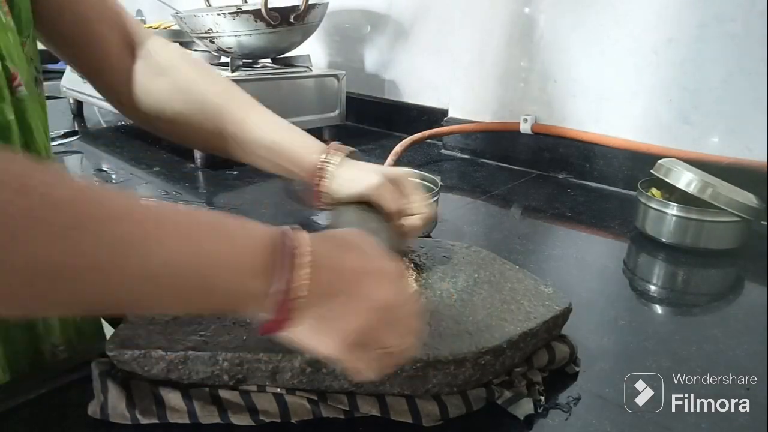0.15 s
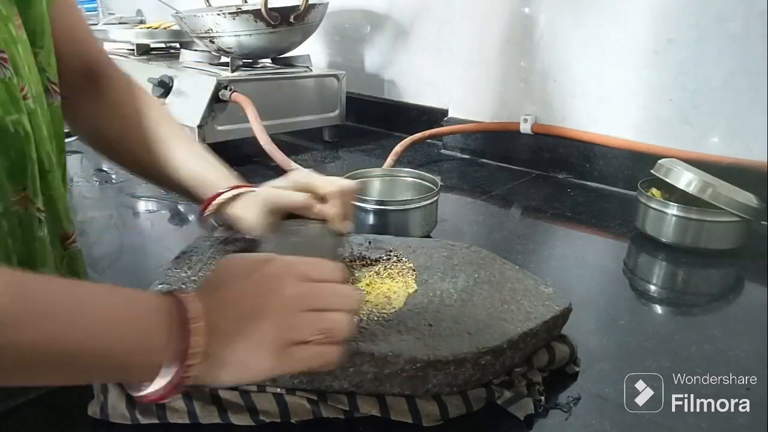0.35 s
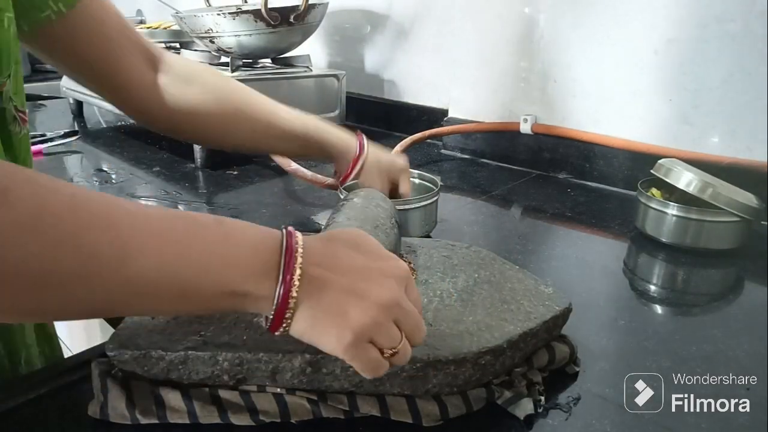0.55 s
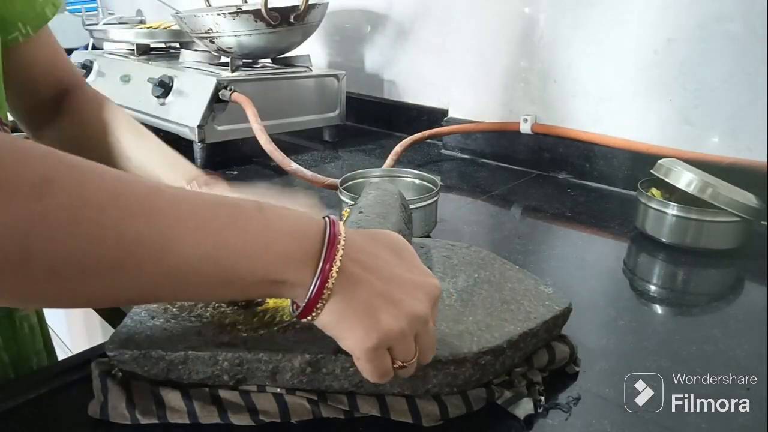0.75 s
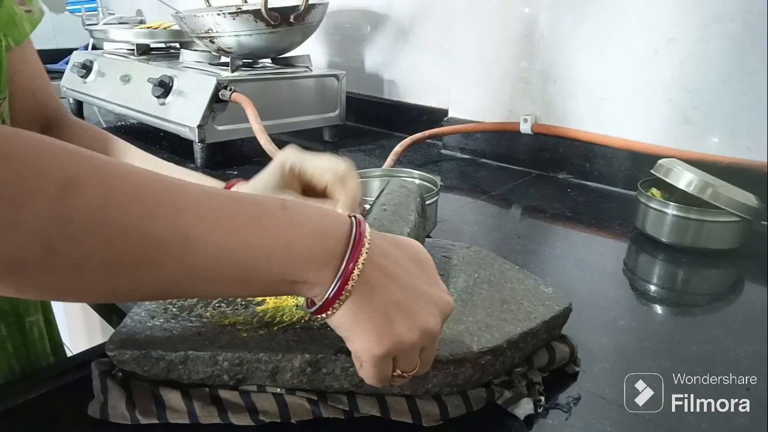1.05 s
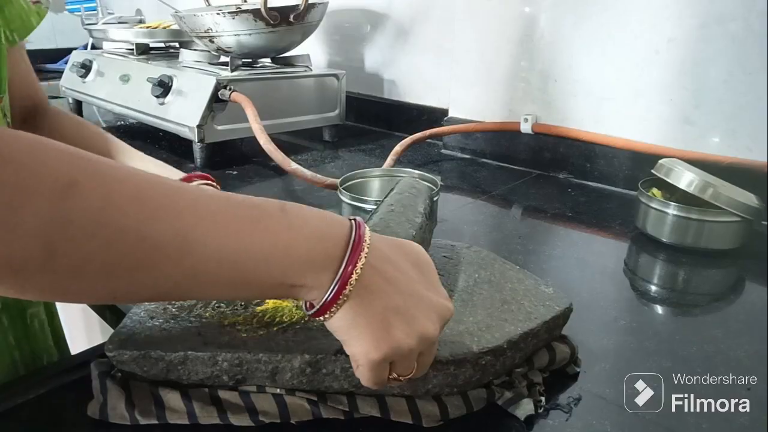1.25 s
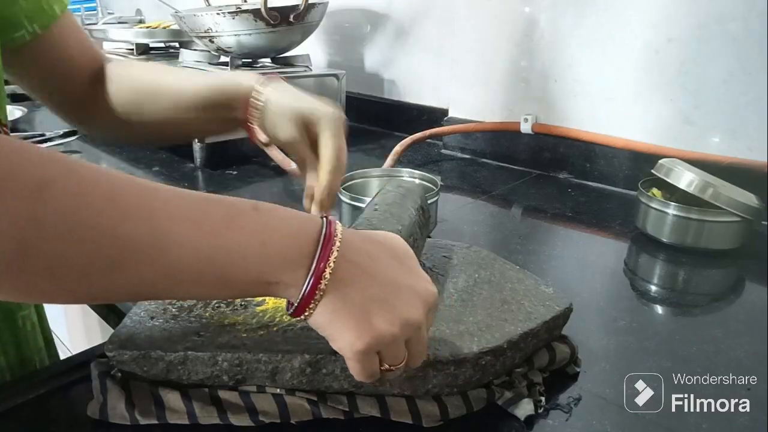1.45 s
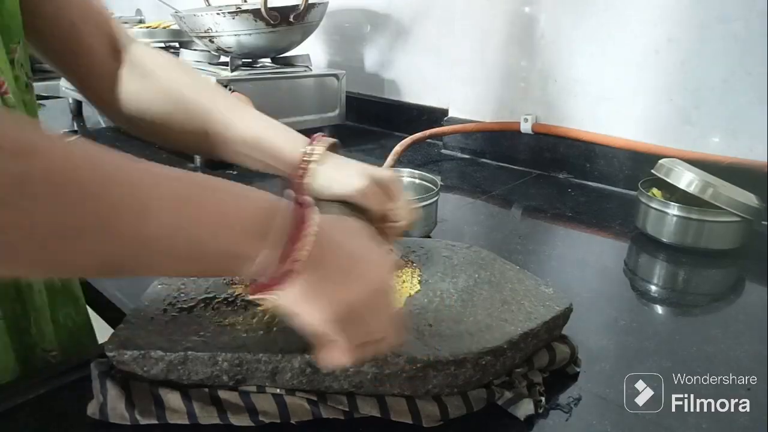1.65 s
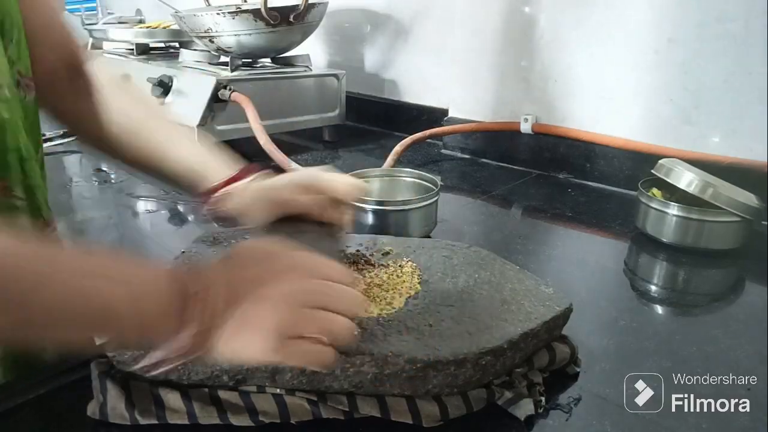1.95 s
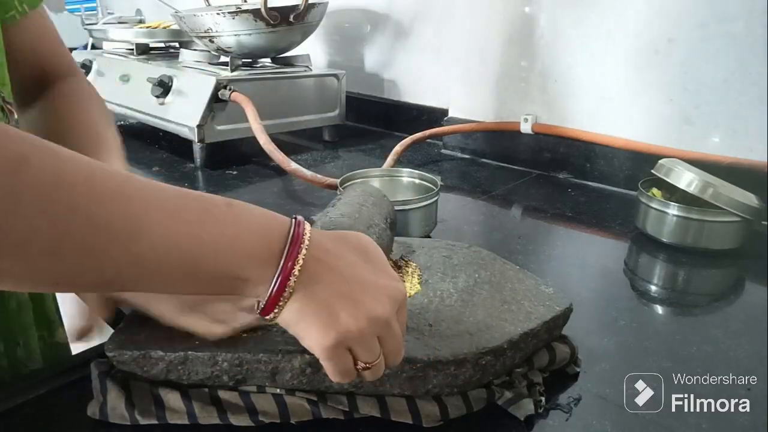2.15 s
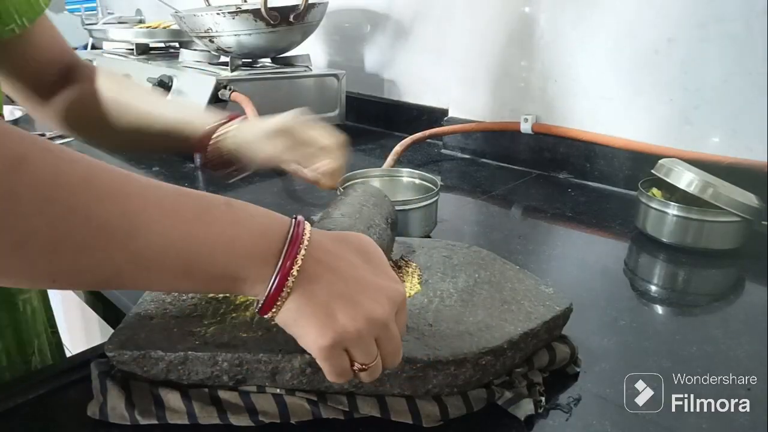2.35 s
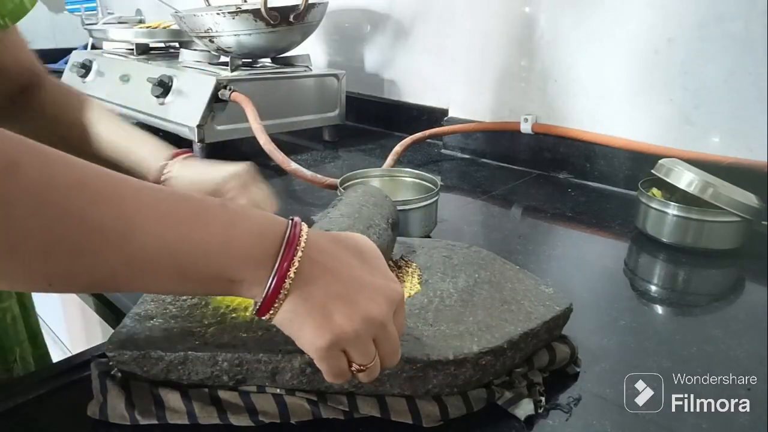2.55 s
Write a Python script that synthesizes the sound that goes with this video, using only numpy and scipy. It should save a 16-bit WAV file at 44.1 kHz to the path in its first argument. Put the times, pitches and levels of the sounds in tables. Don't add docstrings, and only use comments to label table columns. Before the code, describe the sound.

Stone roller grinding spice seeds on a stone slab in two rasping strokes, bangles clinking between

```python
import sys
import numpy as np
from scipy import signal
from scipy.fft import rfft, irfft
from scipy.io import wavfile
from scipy.ndimage import uniform_filter1d

SR = 44100
rng = np.random.default_rng(int(sys.argv[2]) if len(sys.argv) > 2 else 0)


def voltage_ratio(decibels):
    exponent = np.asarray(decibels, float) / 20
    return 10 ** exponent


def store_pcm(level_fs):
    pcm = np.round(np.clip(level_fs, -1, 1) * 32767).astype(np.int16)
    wavfile.write(sys.argv[1], SR, np.atleast_2d(pcm).T)


N = 119070

# time_s, slab_level_db
STROKE_WEIGHT = [
    [(.155, -79), (.182, -42.5), (.27, -36.5), (.35, -34.5), (.45, -42.5), (.49, -35.5), (.6, -39),
     (.77, -30), (.805, -56)],
    [(1.855, -80), (1.885, -39.5), (1.955, -38.5), (2.05, -38), (2.165, -31), (2.32, -40.5), (2.355, -30),
     (2.415, -33), (2.445, -68)],
]
# start_s, drone_db, rumble_db
RIDGES = [(0.179, -42, -50), (.208, -56, -40.5), (.238, -41, -46), (0.271, -38.5, -38), (.31, -44, -49),
          (.348, -32.5, -45), (.385, -52, -42.5), (.418, -36, -39.5), (.482, -36, -39), (0.516, -63, -39),
          (0.567, -43.5, -52), (.595, -44, -46), (0.665, -40, -37), (.712, -43, -52), (.74, -34.5, -44),
          (.762, -32.5, -45), (0.78, -45, -47.5), (1.891, -41.5, -62), (1.919, -48, -42.5),
          (1.961, -35.5, -41), (2.007, -43, -37), (2.029, -37.5, -53), (2.06, -38.5, -42.5),
          (2.091, -35.5, -43), (2.135, -33.5, -46), (2.166, -34, -41.5), (2.211, -39.5, -44),
          (2.243, -34, -42), (2.275, -36, -45), (2.305, -39, -50), (2.33, -45, -41), (2.355, -29.5, -48),
          (2.396, -43, -39.5), (2.414, -37.5, -54)]
# freq_hz, level_db (per Hz)
SLAB_COLOUR = [(30, -40), (76, -14.5), (190, -6), (260, -11), (350, -17), (520, -29.5), (1500, -37)]
# start_s, grit_db, dull_crunch_db (relative to grit)
CRUSHES = [(0.184, -40.5, 3), (0.226, -33, -6.5), (0.268, -28, -11), (0.312, -27.5, -29), (0.356, -22, -39),
           (0.398, -23.5, -26), (0.444, -22, -17), (0.489, -22, -27), (0.534, -25.5, -22),
           (0.584, -25.5, -23), (0.633, -23, -33), (.669, -25, -18.5), (0.729, -25, -14.5),
           (0.776, -26, -25.5), (1.888, -32.5, -13.5), (1.923, -23, -13.5), (1.982, -21, -21),
           (2.027, -25, -31), (2.069, -27.5, -3.5), (2.111, -24.5, -15), (2.145, -23.5, -15),
           (2.177, -25.5, -10), (2.21, -32, -1), (2.249, -27, -12), (2.281, -24.5, -12.5),
           (2.317, -27.5, -17.5), (2.36, -23.5, -20.5), (2.402, -29.5, -9), (2.579, -74.5, 23.5)]
# freq_hz, level_db (per Hz)
GRIT_COLOUR = [(1500, -11.5), (2400, 1.5), (4000, 3.5), (6500, 2.5), (12000, 0.5), (15600, 1)]
# pitch_hz, width_hz, level_db
GRIT_PEAKS = [(8600, 70, 7), (13850, 50, 7), (15450, 200, 4)]
# start_s, ring_db, crack_db, tilt_right_db
CLINKS = [
    (.832, -19.5, -23, 1.5),
    (1.75, -18, -22, 4.5),
]
# freq_hz, level_db (per Hz)
CRACK_COLOUR = [(200, -15), (600, -18.5), (2000, 1.5), (4500, 2), (9500, 3.5), (12000, -4), (15500, -0.5)]
BANGLE_HZ = [1057, 3080, 3410, 3610, 3746, 3788, 4025, 4995, 5020, 5215, 6400, 7070, 8610, 1052]
BANGLE_T60 = [0.056, 0.08, 0.054, 0.042, 0.12, 0.067, .1, 0.073, 0.033, 0.015, 0.037, .045, 0.038, 0.19]
BANGLE_DB = [
    [-14, -21, -20.5, -17.5, -10.5, -6, -17, -12, -0.5, -0.3, -12.5, -24, -15, -35.5],
    [-10, -12, -8, -11.5, -16, -8.5, -10, -16, -7, -0.5, -16, -16, -28, -18.5],
]
# start_s, middle_db, dull_db, bright_db
TOUCHES = [(.005, -39.5, -54.5, -32.5), (0.037, -51.5, -66, -57), (0.945, -50.5, -60, -49.5),
           (.992, -46.5, -44, -43), (1.051, -73, -75, -54), (1.128, -59, -82, -53.5),
           (1.167, -45.5, -44, -44), (1.221, -55.5, -57, -60), (1.323, -56, -71, -40.5),
           (1.362, -65, -53, -44), (1.407, -41, -68, -36.5), (1.462, -50.5, -67, -41.5),
           (1.489, -49, -75, -41.5), (1.535, -46.5, -54, -35), (1.645, -69, -53, -60),
           (1.658, -62, -75, -42.5), (1.691, -58, -68, -55), (1.84, -51, -70.5, -34),
           (2.476, -41.5, -54, -35.5), (2.575, -81, -49, -55), (2.619, -42, -47.5, -65),
           (2.674, -63, -84, -61)]
# pitch_hz, width_hz, level_db
JINGLE_PEAKS = [(1450, 120, 6), (2700, 50, 11), (3750, 150, 7), (5170, 110, 9), (8610, 40, 14),
                (12530, 50, 9), (13870, 45, 13)]
# start_s, pitch_hz, level_db, t60_s
KNOCKS = [(.078, 168.5, -42, 0.014), (.082, 3105, -49, 0.18), (.137, 3110, -51.5, 0.017),
          (.1, 3560, -59, 0.43), (.02, 3970, -55, 0.25), (.09, 2650, -61, .05), (.07, 520, -72, .05),
          (.944, 3200, -47, .015), (.944, 2450, -53, .015), (1.02, 1250, -59, .04), (1.17, 1430, -52, .12),
          (1.325, 5300, -55, .015), (1.36, 500, -64, .02), (1.41, 2700, -48, .015), (1.41, 5150, -54, .15),
          (1.468, 500, -65, .02), (1.472, 3750, -47, .02), (1.524, 3800, -50, .015),
          (1.53, 2880, -55, .015), (1.61, 2900, -68, .02), (1.77, 1620, -51, .08), (1.84, 13870, -45, .02),
          (2.36, 450, -34, .02), (2.66, 80, -48.5, .15), (.902, 6300, -52, 0.018), (1.165, 84, -52, 0.22),
          (1.165, 5130, -49.5, 0.048), (1.25, 860, -57.5, 0.025), (1.275, 512, -61.5, 0.01),
          (1.36, 822, -57, 0.022), (1.468, 851, -52, 0.019), (2.4, 123, -33, 0.013), (2.4, 444, -40, 0.014),
          (2.571, 88, -35.5, 0.12), (2.571, 170, -48, 0.051), (2.62, 2800, -45, 0.015)]
# freq_hz, level_db (per Hz)
ROOM_COLOUR = [(30, 2), (134, 13.5), (512, -7.5), (1390, 0), (4190, -8.5), (9000, 1.5), (11000, -37),
               (16000, -55)]
# freq_hz, gain_db
MIC_COLOURS = [
    [(300, 7.5), (4000, -1), (5500, -4), (6450, -13), (7400, -5), (8600, -1.5), (12000, -1), (15500, 3.5)],
    [(300, 7.5), (4000, 0), (5900, 2.5), (7000, -1), (9200, -18.5), (10700, -7), (13000, -3.5), (15500, 0)],
]

SMEAR_S, SKEW = 0.041, 0.67


def slab():
    slab_hz, ridge_s = 234.6, 0.052
    start_s, drone_db, rumble_db = np.transpose(RIDGES)

    wander = 1.14 * drift(9.7)
    between_mics = np.pi / 2 + 0.46 * wander[1]
    phase = 2 * np.pi * slab_hz * np.arange(N) / SR + wander[0]
    phase = phase + np.array([[0], [1]]) * between_mics
    drone = swells(start_s, drone_db, ridge_s) * np.sqrt(2) * np.sin(phase)

    low = noise(SLAB_COLOUR, (), 20, 205.0)
    low = low / (np.abs(signal.hilbert(low)) + .3) ** 0.49
    rumble = swells(start_s, rumble_db, ridge_s * 1.36) * low / low.std()

    hum = voltage_ratio(stroke_db() - 8) * noise(SLAB_COLOUR, (), 220.0)
    return drone + rumble + hum


def stroke_db():
    t = np.arange(N) / SR
    strokes = [np.interp(t, *np.transpose(w), left=-120, right=-120) for w in STROKE_WEIGHT]
    return np.max(strokes, axis=0)


def grit():
    crush_s, crush_db, rasp_db, rasp_dull_db = 0.073, -2, -32.5, -62.5
    start_s, grit_db, dull_db = np.transpose(CRUSHES)

    weight = stroke_db() + 50
    rasp = voltage_ratio(np.where(weight > 0, 0.37, 1.3) * weight - 6)
    bright_swells = swells(start_s, grit_db + crush_db, crush_s)
    dull_swells = swells(start_s, grit_db + dull_db + crush_db, crush_s * 0.86)
    bright_level = np.hypot(bright_swells, voltage_ratio(rasp_db) * rasp)
    dull_level = np.hypot(dull_swells, voltage_ratio(rasp_dull_db) * rasp)

    crunch_colour = [(300, 3.0), (700, -2.5), (1200, -8.0), (2000, -3.5)]  # Hz, dB per Hz
    crunch = mottle(noise(crunch_colour, (), 300, 2130), 5.6, 150, .015)
    crackle = mottle(noise(GRIT_COLOUR, GRIT_PEAKS, 1400), 1.9, 500, .015)
    return dull_level * crunch + bright_level * crackle


def clinks():
    out = 0
    for (start_s, ring_db, crack_db, tilt_db), strengths in zip(CLINKS, BANGLE_DB):
        modes = zip(BANGLE_HZ, strengths, BANGLE_T60)
        ring = rings([(start_s, hz, ring_db + mode_db, t60) for hz, mode_db, t60 in modes])
        ring = ring * voltage_ratio([[-tilt_db / 2], [tilt_db / 2]])
        crack_level = swells([start_s, start_s + 0.026], [crack_db, crack_db - 18.0], SMEAR_S * 1.32)
        crack = crack_level * mottle(noise(CRACK_COLOUR), 2.8, 300, .03)
        out = out + ring + crack
    return out


def touches():
    start_s, middle_db, dull_db, bright_db = np.transpose(TOUCHES)
    sheen_db = bright_db - 12 + 0.87 * np.minimum(bright_db - middle_db - 3, 0)
    bands = [(dull_db, 1150, 2300), (middle_db, 2300, 7000),
             (bright_db - 1, 7000, 10500), (sheen_db, 10500, 2e4)]
    flat = [(1000, 0), (16000, 0)]
    out = 0
    for level_db, low_hz, high_hz in bands:
        hiss = mottle(noise(flat, JINGLE_PEAKS, low_hz, high_hz), 3.0, 500, .03)
        out = out + swells(start_s, level_db - 4, SMEAR_S * 1.347) * hiss
    return out


def knocks():
    return rings(KNOCKS)


def room_tone():
    return voltage_ratio(-62) * mottle(noise(ROOM_COLOUR), 3.5, 600, 0.036)


def rings(rows):
    out = np.zeros((2, N))
    t = np.arange(SR // 2) / SR
    strike = smear(t[:SR // 10] - SMEAR_S / 2, SMEAR_S)
    flutter_db = 8.5 * np.tanh(drift(66.3))
    for (start_s, hz, level_db, t60), (left, right, pan) in zip(rows, rng.random((len(rows), 3))):
        shape = signal.fftconvolve(voltage_ratio(-60 * t / t60), strike)[:len(t)]
        turns = np.array([[left], [right]])
        wave = shape / shape.max() * np.sin(2 * np.pi * (hz * t + turns))
        stretch_db = flutter_db[:, int(left * N / 2):][:, :len(t)]
        wave = wave * voltage_ratio(min(hz / 4000, 1) * stretch_db)
        side_db = 4 * (pan - .5) * np.array([[-1], [1]])
        start = max(int((start_s - SMEAR_S / 2) * SR), 0)
        out[:, start:start + len(t)] += (voltage_ratio(level_db + side_db) * wave)[:, :N - start]
    return out


def smear(t, length):
    place = np.clip(t / length + .5 ** (1 / SKEW), 0, 1)
    return np.sin(np.pi * place ** SKEW) ** 2


def swells(times, levels_db, length):
    t = np.arange(0, N + 16, 16) / SR
    shapes = smear(t - np.array(times)[:, None], length)
    coarse = np.sqrt(voltage_ratio(2 * np.array(levels_db)) @ shapes ** 2)
    return np.interp(np.arange(N) / SR, t, coarse)


def at_hz(points, hz):
    points = np.array(points)
    return np.interp(np.log(hz + 1), np.log(points[:, 0]), points[:, 1])


def noise(spectrum, peaks=(), low_hz=0.87, high_hz=3e4):
    hz = np.fft.rfftfreq(N, 1 / SR)
    resonance = 1 + sum(voltage_ratio(2 * db) / (1 + (2 * (hz - f) / w) ** 2) for f, w, db in peaks)
    edges = (1 + (low_hz / (hz + 1)) ** 8) * (1 + (hz / high_hz) ** 8)
    gain = voltage_ratio(at_hz(spectrum, hz)) * np.sqrt(resonance) / np.sqrt(edges)
    x = irfft(rfft(rng.standard_normal((2, N))) * gain, N)
    return x / x.std()


def drift(rate_hz):
    lowpass = signal.butter(2, rate_hz, fs=SR, output="sos")
    x = signal.sosfilt(lowpass, rng.standard_normal((2, N + SR)))[:, SR:]
    return x / x.std()


def mottle(x, depth_db, width_hz, length):
    hz, _, spec = signal.stft(x, SR, nperseg=512)
    field = rng.standard_normal(spec.shape[1:])
    for _ in range(2):
        field = uniform_filter1d(field, max(int(width_hz * 512 / SR), 1), axis=0)
        field = uniform_filter1d(field, max(int(length * SR / 256), 1), axis=1)
    field = field / field.std() * np.minimum(hz / 700, 1)[:, None]
    out = signal.istft(spec * voltage_ratio(depth_db * field), nperseg=512)[1][:, :N]
    return out * x.std() / out.std()


def scene():
    noisy = mottle(grit() + touches() + room_tone(), 3, 90, .035)
    return slab() + noisy + clinks() + knocks()


def band_limit(x):
    return signal.sosfilt(signal.butter(12, 17000, fs=SR, output="sos"), x)


def record(dry):
    hz = np.fft.rfftfreq(N, 1 / SR)
    top_cut = np.clip((15750 - hz) / 80 + .5, 0, 1)
    gain = voltage_ratio([at_hz(m, hz) for m in MIC_COLOURS]) * top_cut
    mix = irfft(rfft(dry) * gain, N)
    return band_limit(mix)


dry = scene()
out = record(dry)
store_pcm(out)
```